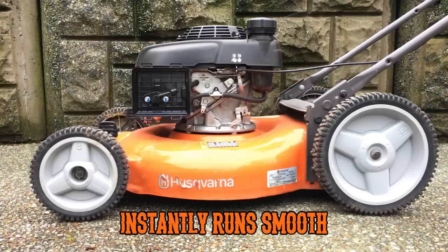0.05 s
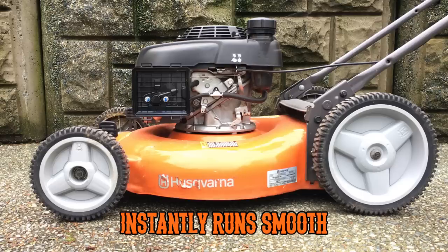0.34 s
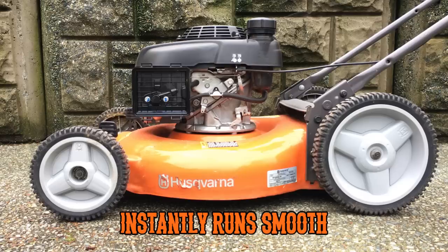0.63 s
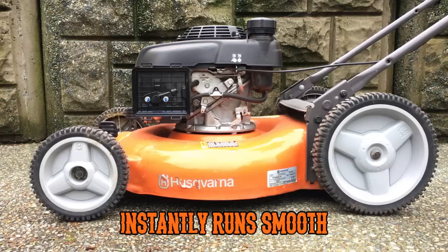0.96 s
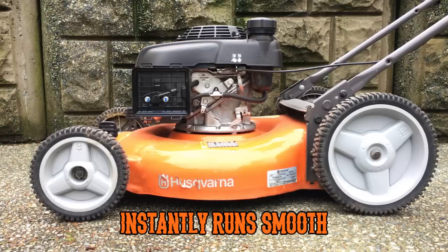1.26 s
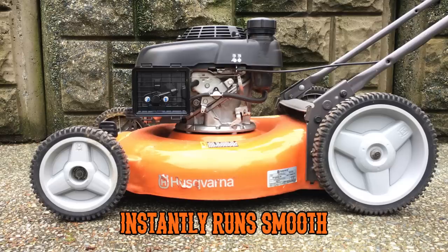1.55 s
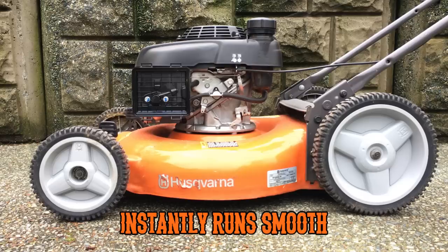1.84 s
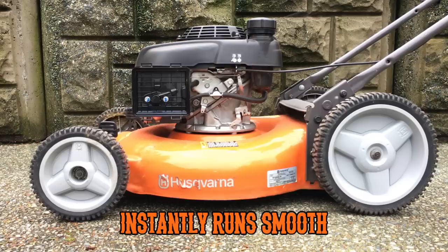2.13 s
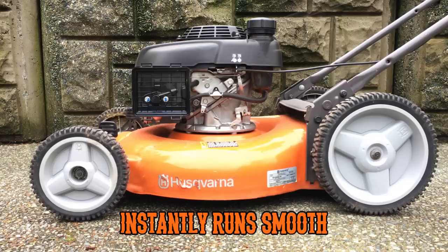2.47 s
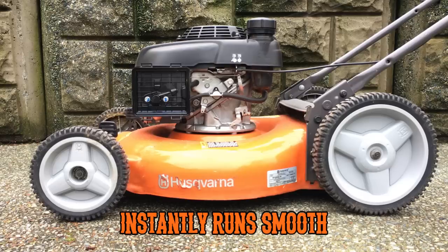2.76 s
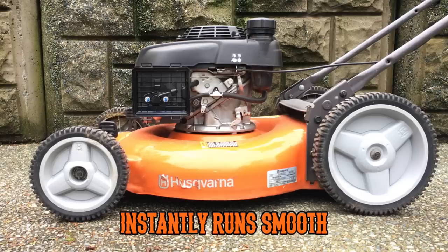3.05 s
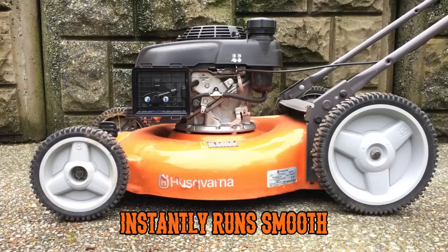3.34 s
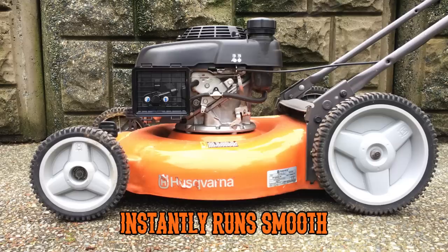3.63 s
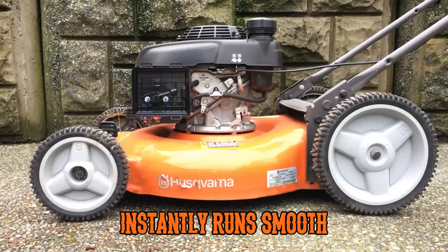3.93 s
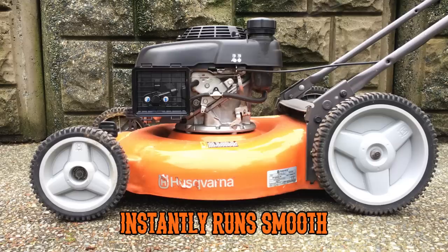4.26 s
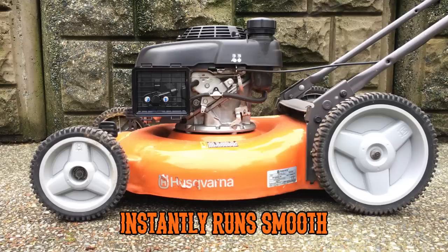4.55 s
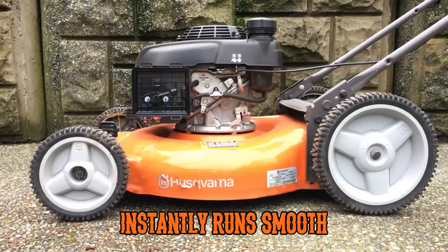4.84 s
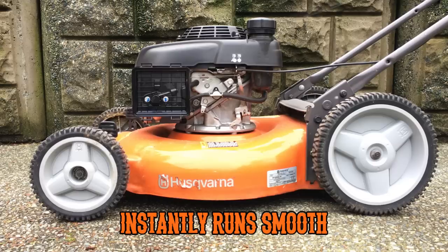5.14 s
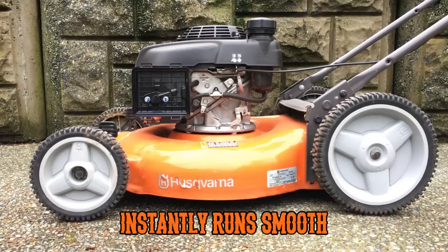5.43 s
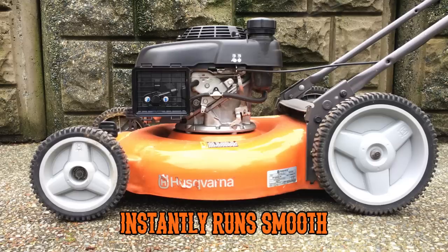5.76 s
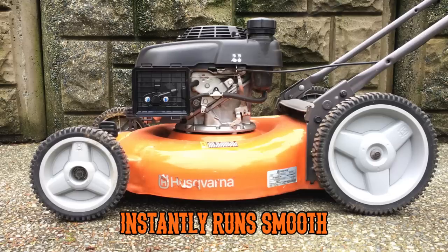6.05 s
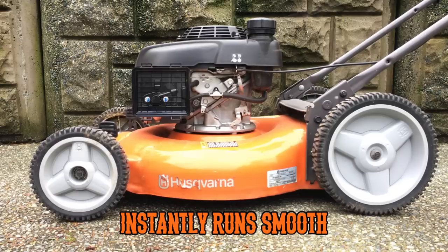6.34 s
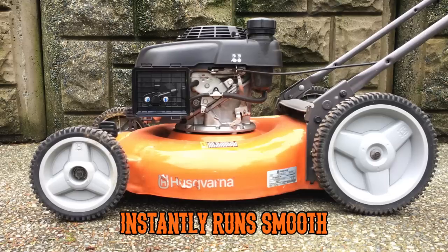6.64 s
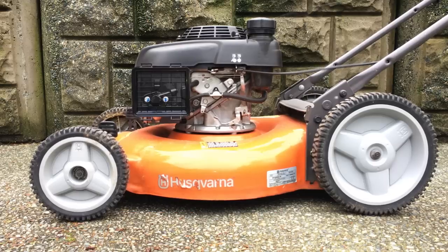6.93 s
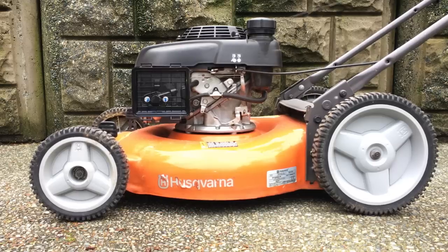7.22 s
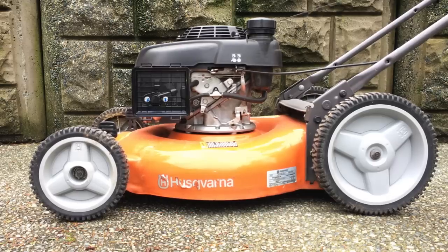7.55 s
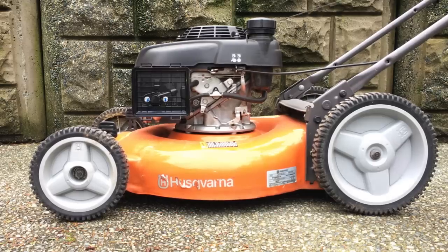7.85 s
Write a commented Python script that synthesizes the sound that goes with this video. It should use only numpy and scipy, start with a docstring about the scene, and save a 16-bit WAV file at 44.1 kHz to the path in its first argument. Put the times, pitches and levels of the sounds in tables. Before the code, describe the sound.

From the start, a small four-stroke petrol lawn mower is already running outdoors, straight ahead of the microphone in mono. The blade makes a strong low hum and a broad rush of air, mixed with a throbbing exhaust, light hiss and rapid valve clatter. The speed stays even, wavering only slightly. At about 6.7 seconds the engine is switched off. A brake rubs, and the hum falls quickly in pitch and loudness. From around 7 seconds the coasting engine gives deep throbs and hissy spits of air that slow and spread apart, with a very short echo off a nearby wall. Soft low gulps and crisp valve ticks emerge as it slows. Between 7.8 and 8 seconds, about four faint metal clinks sound as the engine comes almost to rest.

```python
"""A small four-stroke petrol lawn mower on paving by a wall, straight ahead of the microphone, in mono.
At first it runs at governed speed: the blade hums and churns the air under the deck, the exhaust
throbs and the valve gear clatters. At about 6.7 s it is switched off: the brake rubs, the piston
pumps cold air and the compression release spits once a cycle, with a short echo off the wall.
By 8 s the crank is nearly at rest, with last gulps of air, valve ticks and clinks of loose parts."""
import sys
import numpy as np
from scipy import signal
from scipy.fft import rfft, irfft, next_fast_len
from scipy.io import wavfile

SR = 44100
rng = np.random.default_rng(int(sys.argv[2]) if len(sys.argv) > 2 else 0)


def dump(signal):
    """Clip the signal to [-1, 1] and save it as 16-bit WAV at the path in sys.argv[1]."""
    limited = np.clip(np.atleast_2d(signal).T, -1, 1)
    pcm = np.round(limited * 32767).astype(np.int16)
    wavfile.write(sys.argv[1], SR, pcm)


N = 356769
TIME = np.arange(N) / SR
BRAKE_S, CUT_S = 6.727, 6.753  # the brake drops on; first stroke without a spark
# crank speeds [turns/s]: held by the governor; under which single strokes stand out
GOVERNED, SLOW_SPEED = 53.2, 34
# resonances of the mower and hollows from sound bouncing off the paving
# (frequency [Hz], width [Hz], gain [dB])
MOWER_ON_PAVING = [(580, 74, -2.5), (783, 130, 0.5), (1146, 69, 1.5), (1313, 117, 1.5), (1570, 110, -4.5),
                   (2880, 270, -2.5), (4220, 270, 1.5), (4930, 380, -2), (5900, 1300, 1), (7700, 900, -2.5),
                   (10450, 530, -3)]
# resonances of the engine block (frequency [Hz], width [Hz], gain [dB])
BLOCK = [(581, 100, 2.9), (1120, 73, 6.6), (1270, 80, 3.8), (3220, 160, 4.1), (4270, 300, 4.9),
         (6400, 200, 4), (10100, 300, 4)]


def crank(hunt=.0055, hunt_hz=3, unsteady=.003):
    """Crank speed and turns: the governor hunts, uneven burns jostle, then brake and air drag slow it."""
    brake_loss, drag_loss = 33.31, 10.11  # [turns/s^2]: steady friction; square-law drag at full speed
    braking_s = np.maximum(TIME - BRAKE_S, 0)
    ratio = np.sqrt(brake_loss / drag_loss)
    pace = ratio * np.tan(np.arctan(1 / ratio) - np.sqrt(brake_loss * drag_loss) * braking_s / GOVERNED)
    firing = np.clip((BRAKE_S - TIME) * 10, 0, 1)
    speed = GOVERNED * pace * (1 + firing * (hunt * waver(hunt_hz) + unsteady * waver(25)))
    turns = np.cumsum(speed) / SR
    return speed, turns - np.interp(CUT_S, TIME, turns)  # zero at the cut, two turns to a cycle


def blade(speed, turns, pace_db, fall=1.8, flutter=0.022, phase_spread=0.046):
    """Each blade tip pushes a pulse through the deck, its partials slightly spread in phase."""
    # blade-tip pulses (frequency [x crank speed], level [dB])
    partials = [(2, -16.5), (4, -26), (6, -26.5), (8, -32), (10, -38.5)]
    # how the deck passes them (frequency [Hz], gain [dB])
    deck = [(25, -28), (50, -11), (80, -13), (106, -5), (145, -6), (180, -2.5), (212, 1), (260, 7),
            (320, -1), (420, -16), (600, -4)]
    hum = np.zeros(N)
    for k, db in partials:
        level = amp(db + level_at(deck, k * speed)) * (1 + flutter * waver(32))
        hum += level * np.cos(2 * np.pi * k * turns + phase_spread * k ** 2)
    return np.sqrt(2) * hum * amp(fall * pace_db)


def churned_air(turns, pace_db, rumble_db=-33, rush_db=-26, rumble_fall=1.35, rush_fall=2.75):
    """Turbulence from blade and cooling fan swells with each tip and dies fast as the crank slows."""
    # low turbulence (frequency [Hz], level [dB])
    rumble_spectrum = [(20, -40), (45, -5), (100, -28), (160, -4.5), (215, -1.5), (265, 6), (320, -5.5),
                       (390, -5.5), (600, -31)]
    # broad rush of air (frequency [Hz], level [dB])
    rush_spectrum = [(210, -47), (350, -14), (373, -11), (482, -12.5), (538, -4), (897, -9.5), (1160, -4),
                     (1570, -9.5), (2260, -11), (2830, -15), (3260, -13), (5800, -20.5), (7720, -24),
                     (15100, -32.5), (15800, -69)]
    each_tip = .063 * np.cos(4 * np.pi * (turns - .08))
    each_turn = .036 * np.cos(2 * np.pi * (turns - .1))
    each_cycle = .018 * np.cos(np.pi * (turns - 1.5))
    gusts = .027 * waver(9.3)
    rumble = noise(rumble_spectrum) * amp(rumble_db + rumble_fall * pace_db)
    rush = noise(rush_spectrum, MOWER_ON_PAVING) * amp(rush_db + rush_fall * pace_db)
    return (1 + each_tip + each_turn + each_cycle + gusts) * (rumble + rush)


def exhaust(turns, pace_db, open_turns=1.05, uneven=0.12, stray=0.39, unfired_db=-3, fall=0.78):
    """One blow every second turn, each of its own strength, weaker once the spark is gone."""
    # exhaust and shaking of the block (frequency [x crank speed], level [dB])
    partials = [(.5, -65), (1, -38), (1.5, -41), (2.5, -36.5), (3, -43), (3.5, -51), (4.5, -37.5), (5, -51),
                (6.5, -37.5), (7, -44), (7.5, -46), (8.5, -42.5), (9.5, -44.5), (10.5, -46), (11, -43.5),
                (12, -62), (13, -48.5), (14, -45.5), (16, -45.5)]
    throb = np.zeros(N)
    for k, db in partials:
        wander = 1 + stray * k / (k + 5) * waver(7.1)  # low partials are steadier
        throb += amp(db) * wander * np.sin(2 * np.pi * k * (turns - open_turns))
    unfired = np.clip((TIME - CUT_S) / .05, 0, 1)
    return np.sqrt(2) * throb * (1 + uneven * waver(32)) * amp(unfired_db * unfired + fall * pace_db)


def clatter(turns, pace_db, db=-33, t60=0.073, uneven_db=2, play_turns=.012, fall=1.2):
    """Piston and valves knock at their crank angles, give or take some play; each has its own ring."""
    # knocks of piston and valves (position [share of a cycle], level [dB])
    knocks = [(.75, 0.5), (0.98, -2.5), (.31, -2.5), (.51, -3.5)]
    # ring of a knock (frequency [Hz], level [dB])
    spectrum = [(300, -41), (550, -8.5), (900, 2), (1250, 2), (1600, 5.5), (2100, -4.5), (2900, -9),
                (3500, -8), (7000, -32), (16000, -51)]
    out, t = np.zeros(N), np.arange(SR // 12) / SR
    for share, knock_db in knocks:
        cycles = (turns + play_turns * waver(30)) / 2 - share
        count = np.floor(np.maximum.accumulate(cycles))
        ring = noise(spectrum, MOWER_ON_PAVING, size=len(t)) * amp(-60 * t / t60)
        blows = np.diff(count, prepend=count[0]) * amp(knock_db + uneven_db * rng.standard_normal(N))
        out += signal.oaconvolve(blows, ring)[:N]
    return amp(db) * unit(out * amp(fall * pace_db))


def muffler_hiss(turns, pace_db, db=-43, depth=0.26, fall=3):
    """Gas hisses out of the muffler, swelling once a cycle."""
    # escaping gas (frequency [Hz], level [dB])
    spectrum = [(1500, -23), (4000, -2), (8500, 0), (12000, -8.5), (16000, -10)]
    swell = 1 + depth * np.cos(np.pi * (turns - 1.65))
    return swell * noise(spectrum, MOWER_ON_PAVING) * amp(db + fall * pace_db)


def pumping(speed, turns, pace_db, db=-19, hz=85, width_s=0.0076, fall=2.2):
    """Unfired, the piston pumps cold air: one deep throb every cycle."""
    offset_s = ((turns + 1) % 2 - 1) / speed
    throb = np.cos(2 * np.pi * hz * offset_s) * np.exp(-.5 * (offset_s / width_s) ** 2)
    return (turns > -1) * throb * amp(db + fall * pace_db)


def release_spits(speed, turns, pace_db, db=-22, engage_speed=45.7, width_turns=0.17, widest_s=0.0099):
    """The compression release holds a valve ajar; the slower the crank, the longer and deeper the spit."""
    # jet of air past the valve (frequency [Hz], level [dB])
    spectrum = [(900, -37), (1500, -12), (1900, -2.5), (2900, -2.5), (3800, -9), (4600, -11), (5600, -23.5),
                (6600, -12), (7900, -8), (10000, -9.5), (11600, -17.5), (13000, -1), (13950, -16.5),
                (16000, -13)]
    # resonances and hollows of the valve port (frequency [Hz], width [Hz], gain [dB])
    port = [(1860, 240, 3.5), (2400, 170, 1.5), (2810, 200, 3.5), (3870, 320, -9), (8050, 550, 3),
            (9420, 220, 1), (10200, 300, -3), (10660, 450, 4), (13550, 300, 5), (14600, 300, 3)]
    gate, t = np.zeros(N), np.arange(-SR // 20, SR // 20) / SR
    for s, speed_now in passes(speed, turns, angle=1.829):
        width = min(width_turns / speed_now, widest_s) * np.where(t < 0, .97, 1)
        puff = np.exp(-.5 * abs(t / width) ** 2.9)
        add(gate, s + t[0], amp(db) * below(speed_now, engage_speed, ramp=2) * puff)
    jet = noise(spectrum, port)
    chuff = signal.sosfiltfilt(signal.butter(3, 4200, fs=SR, output="sos"), jet)
    hiss = jet - chuff
    return gate * (hiss + chuff * amp(-1 - .23 * pace_db))


def brake(speed, db=-33, bite_s=.17, fade_speed=14, grab_db=2.1):
    """The flywheel brake bites, rubs unevenly and sets the block ringing; it fades as the rim slows."""
    # rubbing on the rim (frequency [Hz], level [dB])
    spectrum = [(30, -20), (80, 9.5), (250, 7.5), (420, 1), (620, 0), (850, -4), (1200, -2.5), (1600, -7),
                (2200, -3), (4200, -14.5), (6500, -19), (9900, -21.5), (11000, -21), (16000, -30)]
    pressure = np.clip((TIME - BRAKE_S) / bite_s, 0, 1) ** 2
    sliding = speed / np.hypot(speed, fade_speed)
    return noise(spectrum, BLOCK) * pressure * sliding * amp(db + grab_db * waver(50))


def gulps(speed, turns, width_s=0.0045):
    """The last slow piston strokes each gulp air: one soft low thump."""
    # gulping strokes of a cycle (crank angle [turns], level [dB], pitch [Hz])
    strokes = [(1.16, -21, 96), (0.48, -31, 109)]
    out, t = np.zeros(N), np.arange(-SR // 20, SR // 20) / SR
    for angle, db, hz in strokes:
        thump = amp(db) * np.sin(2 * np.pi * hz * t) * np.exp(-.5 * (t / width_s) ** 2)
        for s, speed_now in passes(speed, turns, angle):
            add(out, s + t[0], below(speed_now, SLOW_SPEED, ramp=9) * thump)
    return out


def valve_ticks(speed, turns, db=-27, lag_s=0.016):
    """A slack valve seats just after its cam lets go; the slower the crank, the crisper the tick."""
    out = np.zeros(N)
    for s, speed_now in passes(speed, turns, angle=.28):
        tick = tap(hz=2030, ring_db=-6, tilt_db=6 - .36 * speed_now)
        add(out, s + lag_s, amp(db) * below(speed_now, SLOW_SPEED, ramp=12) * tick)
    return out


def clinks():
    """Loose parts clink as the crank settles, each at its own pitch."""
    # strikes of loose parts (time [s], level [dB], pitch [Hz])
    strikes = [(7.804, -40, 1510), (7.888, -38, 1100), (7.957, -36, 1290), (8.021, -36, 1110)]
    out = np.zeros(N)
    for s, db, hz in strikes:
        add(out, s, amp(db) * tap(hz, ring_db=1, tilt_db=-1))
    return out


def tap(hz, ring_db, tilt_db, rise_s=.002, t60=0.05, ring_t60=0.061):
    """Metal meets metal: a tick that leaves a short ring."""
    # metal contact (frequency [Hz], level [dB])
    spectrum = [(200, -18), (600, -3), (1200, -3), (1600, -5), (2200, -4), (3700, -13), (5500, -13),
                (8000, -17), (16000, -24)]
    t = np.arange(SR // 8) / SR
    tick = noise(spectrum, BLOCK, size=len(t), tilt_db=tilt_db) * amp(-60 * t / t60)
    ring = np.sqrt(2) * np.sin(2 * np.pi * hz * t) * amp(ring_db - 60 * t / ring_t60)
    return np.minimum(t / rise_s, 1) * (tick + ring)


def wall(direct, db=-14, t60=0.052, delay_s=0.0062):
    """The direct sound, then a short echo scattered by the nearby wall and paving."""
    t = np.arange(SR // 4) / SR
    tail = rng.standard_normal(len(t)) * (t > delay_s) * amp(-60 * t / t60)
    return direct + amp(db) * signal.oaconvolve(direct, tail / np.linalg.norm(tail))[:N]


def passes(speed, turns, angle):
    """(time [s], speed [turns/s]) whenever the unfired crank passes an angle [turns] of its cycle."""
    times = np.interp(np.arange(angle, turns[-1], 2), turns, TIME)
    return zip(times, np.interp(times, TIME, speed))


def below(speed, limit, ramp):
    """Grows from 0 to 1 as the speed sinks under a limit."""
    return np.clip((limit - speed) / ramp, 0, 1)


def noise(spectrum, modes=(), size=N, tilt_db=0):
    """Noise of rms 1 with a given spectrum and resonances, tilted per octave above the third point."""
    n = next_fast_len(size)
    hz = np.fft.rfftfreq(n, 1 / SR)
    colour_db = level_at(spectrum, hz) + tilt_db * np.log2(np.maximum(hz, spectrum[2][0]))
    colour_db += sum(db * .5 ** ((2 * (hz - centre) / width) ** 2) for centre, width, db in modes)
    return unit(irfft(rfft(rng.standard_normal(n)) * amp(colour_db), n)[:size])


def waver(rate_hz):
    """Random drift of rms 1, mostly slower than rate_hz."""
    hz = np.fft.rfftfreq(N, 1 / SR)
    return unit(irfft(rfft(rng.standard_normal(N)) / (1 + (hz / rate_hz) ** 4), N))


def level_at(spectrum, hz):
    """Level [dB] of a spectrum, interpolated on a log-frequency axis."""
    points_hz, db = np.transpose(spectrum)
    return np.interp(np.log(hz + 1), np.log(points_hz + 1), db)


def amp(db):
    """Decibels to gain."""
    return 10 ** (np.asarray(db) / 20)


def unit(x):
    """Scales to rms 1."""
    return x / np.sqrt(np.mean(x ** 2) + 1e-20)


def add(mix, s, sound):
    """Mixes a sound in at time s."""
    part = mix[max(round(s * SR), 0):][:len(sound)]
    part += sound[:len(part)]


def scene():
    """One crank drives the mower; it stands straight ahead, the same in both channels."""
    speed, turns = crank()
    pace_db = 20 * np.log10(speed / GOVERNED)  # a source's "fall" is the dB it loses per dB of pace
    engine = exhaust(turns, pace_db) + muffler_hiss(turns, pace_db) + clatter(turns, pace_db)
    spits = release_spits(speed, turns, pace_db)
    coasting = brake(speed) + valve_ticks(speed, turns) + clinks() + gulps(speed, turns)
    stopping = pumping(speed, turns, pace_db) + wall(spits + coasting)
    mower = engine + stopping + blade(speed, turns, pace_db) + churned_air(turns, pace_db)
    return np.array([mower, mower])


def record(dry, low_hz=36, high_hz=15780):
    """The microphone sheds the deepest bass; a steep band limit takes off the highest treble."""
    low_cut = signal.butter(3, low_hz, "highpass", fs=SR, output="sos")
    high_cut = signal.firwin(511, high_hz, window=("kaiser", 9), fs=SR)
    lean = signal.sosfiltfilt(low_cut, dry, padtype="even")
    return signal.oaconvolve(lean, high_cut[None], "same")


dry = scene()
out = record(dry)
dump(out)
```